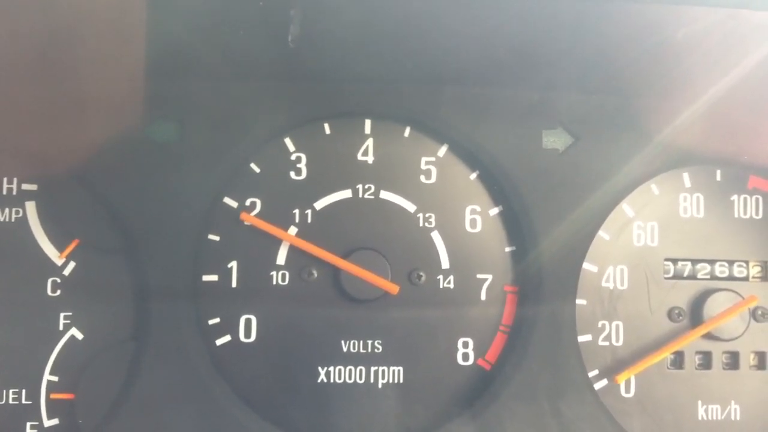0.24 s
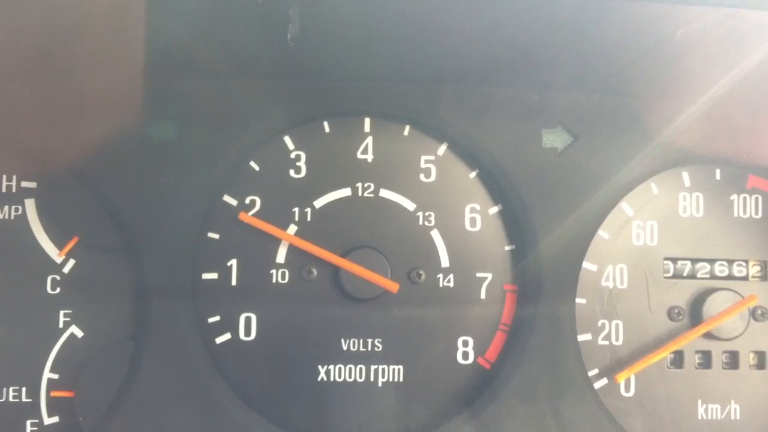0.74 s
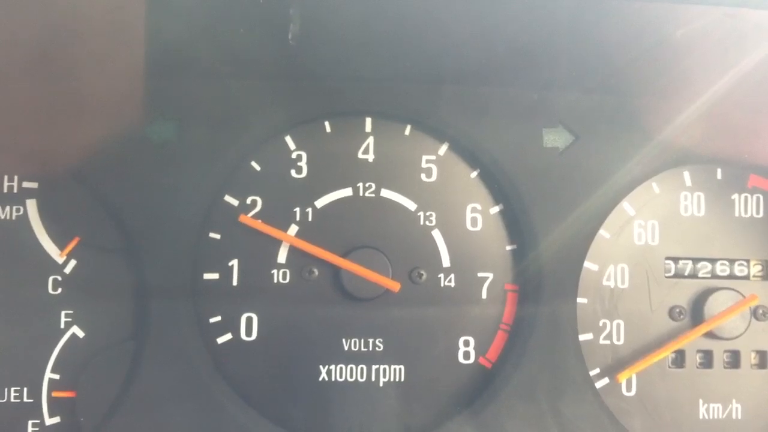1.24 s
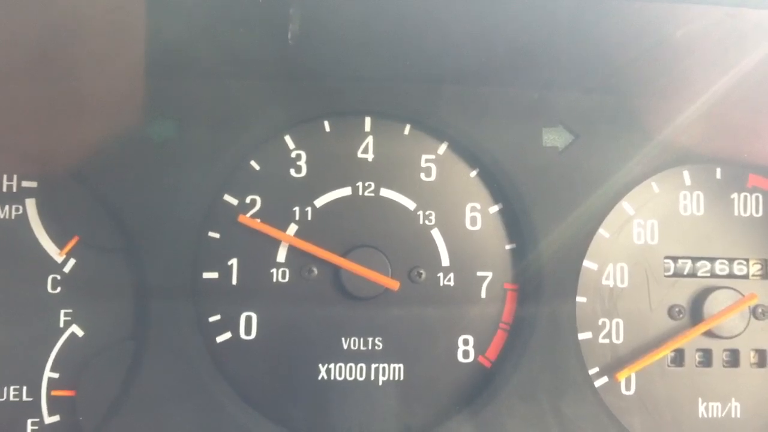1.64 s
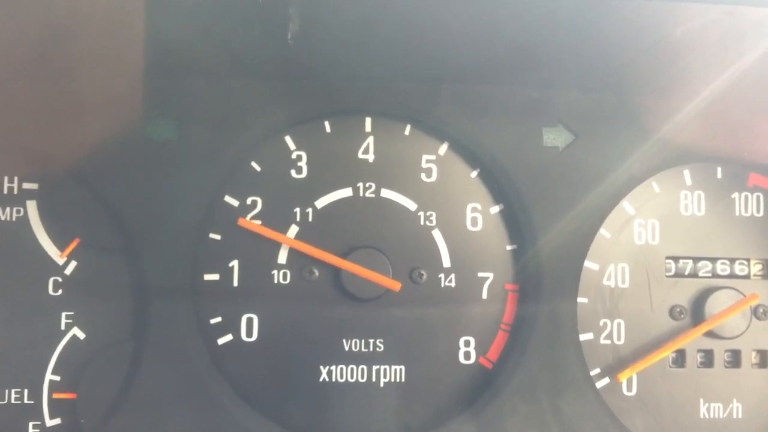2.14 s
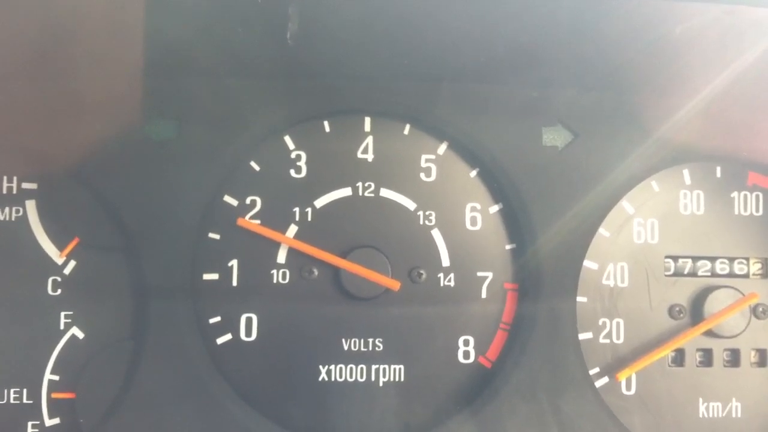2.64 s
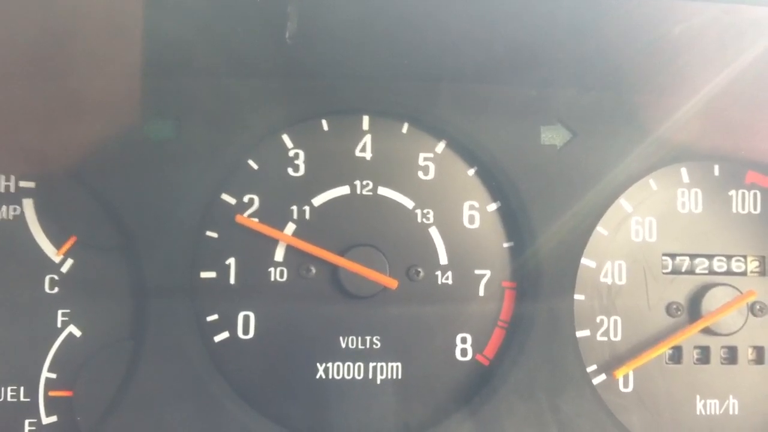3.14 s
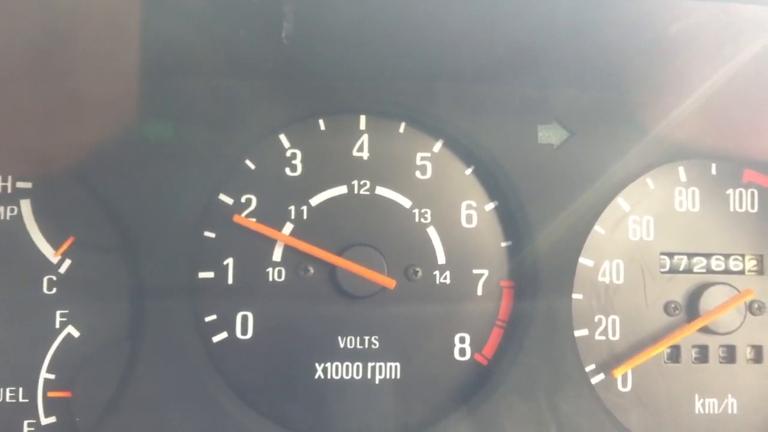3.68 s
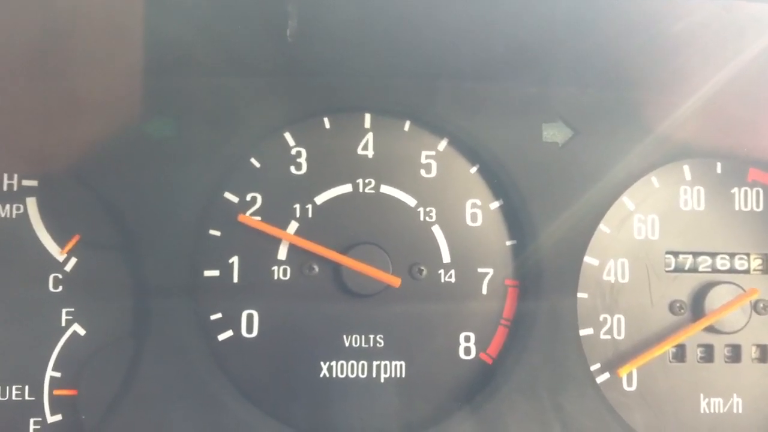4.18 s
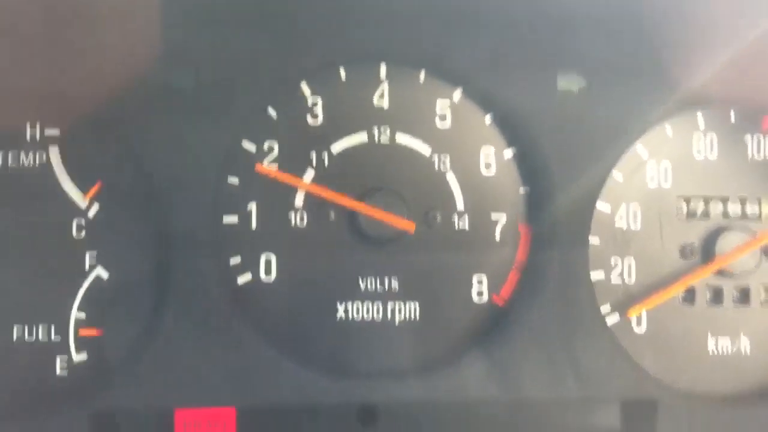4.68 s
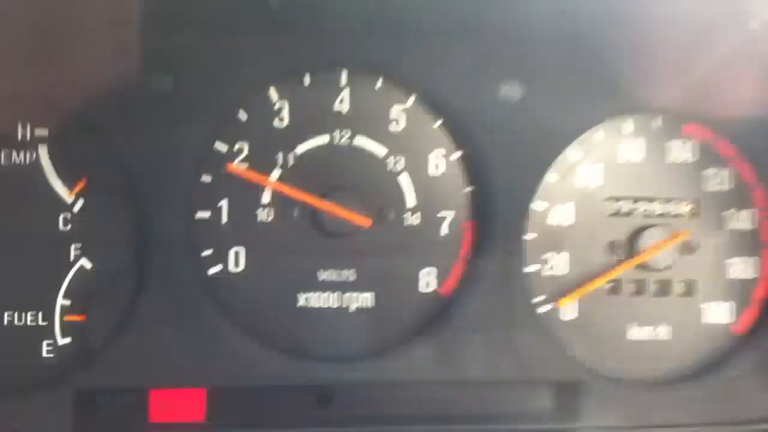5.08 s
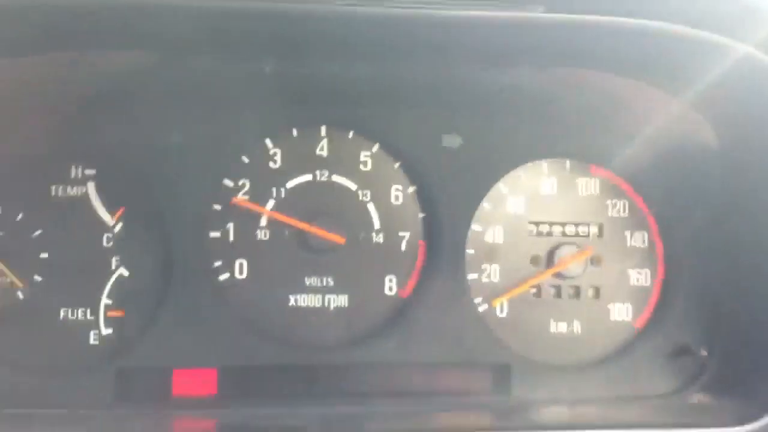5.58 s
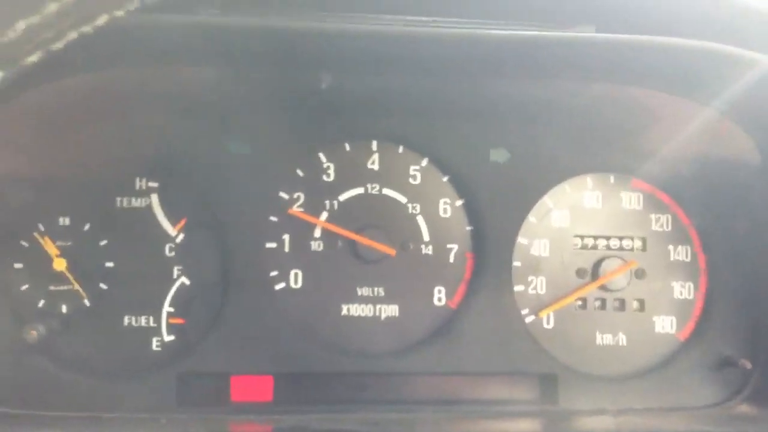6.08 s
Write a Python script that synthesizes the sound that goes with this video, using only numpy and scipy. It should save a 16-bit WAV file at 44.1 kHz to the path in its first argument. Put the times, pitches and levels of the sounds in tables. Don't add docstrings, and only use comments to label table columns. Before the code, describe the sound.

For about 6.3 seconds a rotary engine idles roughly, heard inside a parked car with a small microphone near the dash. From the start, boomy bursts arrive roughly four and a half times a second. Each is a tight cluster of overlapping low thumps with a hollow exhaust ring and rasp, then a short sag filled with weak, uneven puffs. Loose trim gives a dry, hissy rattle with the bursts, notably sharper around 1.1, 1.6, 2.0, 3.2 and 5.1 seconds. A thin alternator whine glides up with every burst and drops back. Steady body drone, fan and intake hiss and floor rumble stay beneath. The rhythm slows very slightly until about 5.5 seconds, then recovers a little. From 4.3 seconds the microphone pulls back, making the tone a bit brighter and the whine clearer. The idle continues to the end without revving or stopping.

```python
import sys
import numpy as np
from scipy import signal
from scipy.fft import rfft, irfft, next_fast_len
from scipy.io import wavfile
from scipy.ndimage import uniform_filter1d, map_coordinates

SR = 44100
rng = np.random.default_rng(int(sys.argv[2]) if len(sys.argv) > 2 else 0)


def convert_level_to_amplitude(level_db):
    exponent = np.asarray(level_db, float) / 20
    return 10 ** exponent


def persist_wave(psi):
    counts = np.round(np.clip(psi, -1, 1) * 32767).astype(np.int16)
    wavfile.write(sys.argv[1], SR, np.atleast_2d(counts).T)


N = 278712

# first blast in seconds, half turns until the other rotor joins, thump in dB,
# rattle of the first blast in dB.
BURSTS = [(0.049, 1, -9, 7), (0.2688, 1, -9, 2), (0.4889, 1, -9, 2), (0.6781, 3, -9.5, 4),
          (0.9007, 3, -9.5, 4), (1.127, 3, -9.5, 10), (1.351, 3, -10.5, 5), (1.5764, 3, -8.5, 10),
          (1.8048, 3, -11.5, 0), (2.0322, 3, -10.5, 10), (2.263, 3, -8.5, 1), (2.4927, 3, -10, 5),
          (2.7558, 1, -8.5, 3), (2.9821, 1, -8.5, 6), (3.2082, 1, -7.5, 17), (3.4376, 1, -9, -9),
          (3.6655, 3, -9.5, 4), (3.893, 3, -11, -9), (4.158, 3, -8.5, -1), (4.3872, 3, -9.5, 5),
          (4.6221, 3, -9.5, 3), (4.8545, 3, -9.5, -4), (5.054, 1, -8.5, 15), (5.239, 1, -9, -23),
          (5.461, 3, -11.5, 4), (5.6836, 1, -10.5, 6), (5.921, 1, -11.5, 2), (6.155, 1, -10, -3)]
ODD_BURSTS = {17: (4, 3), 21: (3, 2), 24: (3, 2)}
# time in seconds, first turn of a burst in ms.
IDLE = [
    (0, 31.7),
    (1, 33.2),
    (3.4, 33.3),
    (4.6, 34.5),
    (5.5, 34.6),
    (6.32, 33.2),
]
# centre in Hz, width in Hz, level in dB, polarity.
PIPE_MODES = [(109.5, 11.5, -16, 1), (130.5, 10.1, -16.5, 1), (185.8, 8.9, -6, 1), (225.2, 41.3, -11, -1),
              (348.2, 21.6, -20.5, 1), (374, 16.4, -27.5, -1), (413, 38.4, -26, 1), (501, 11.6, -26, -1),
              (591, 35, -37, 1), (692, 38, -43, -1)]
# centre in Hz, width in Hz, level in dB, polarity.
BODY_MODES = [(122, 14.2, -15, 1), (202.5, 18.4, -5, -1), (227.6, 46, -13, 1)]
# frequency in Hz, density in dB per Hz.
RASP = [(160, -19.5), (270, -17), (311, -7.5), (435, -13.5), (594, -14.5), (749, -40), (936, -23),
        (1040, -16), (1600, -32.5), (2080, -67), (3520, -120)]
# frequency in Hz, density in dB per Hz.
TRIM_HISS = [(880, 0), (1500, -5), (1620, 0), (2430, 4.5), (2780, 3), (3130, 2), (3770, 0.5), (5160, 3),
             (7560, -1), (8760, -0.5), (10100, -3), (14200, -3.5), (15600, -5)]
# centre in Hz, spread in Hz.
TRIM_PARTS = [(2500, 2700), (5500, 4300), (9000, 4000), (13500, 8500)]
# frequency in Hz, density in dB per Hz.
FASTENER = [(8000, -46), (8650, -4), (8950, 5), (9700, -21)]
# multiple of the whine, level in dB rms.
WHINE_OVERTONES = [(1, -53.5), (2, -65.5), (3, -57), (4, -58), (5, -60), (6, -61), (8, -66)]
# centre in Hz, width in Hz, level in dB, polarity.
CASING_MODES = [(1102, 180, -0.5, 1), (3370, 150, -2, 1)]
# centre in Hz, width in Hz, level in dB, polarity.
DASH_MODES = [(505, 13, 0, 1), (707, 14, 3, 1), (1074, 16.3, 7.5, 1), (3063, 53, -4.5, 1),
              (4300, 68, -7, 1), (5230, 120, -9.5, 1)]
# frequency in Hz, density in dB per Hz.
DRONE = [(150, -33), (250, -7), (301, -11), (347, -15.5), (411, -16.5), (715, -19.5), (781, -24),
         (1060, -21), (1200, -28), (1700, -40), (2210, -50), (3740, -120)]
# frequency in Hz, density in dB per Hz.
RUSH = [(820, 3), (1400, 4.5), (1750, -2), (2870, -3.5), (3140, -4), (3540, -4.5), (5100, -2.5),
        (8020, -10), (9150, -8), (14100, -15.5), (15600, -17.5)]
# frequency in Hz, density in dB per Hz.
RUMBLE = [(41, -42), (70, -75), (107, 23), (129, 46), (156, 18), (216, 13.5), (247, 31), (300, -28),
          (390, -45), (660, -120)]
# time in seconds, share from 0 to 1.
PULL_BACK = [
    (0, 0),
    (4.3, 0),
    (5, 0.4),
    (5.4, 0.7),
    (5.85, 0.76),
    (6.32, 0.92),
]
# frequency in Hz, gain in dB.
BACK_COLOUR = [(60, -3), (110, 2), (200, 2.5), (300, -1), (420, -5.5), (600, -3), (720, 2), (930, 3.5),
               (1080, -6.5), (1500, 1), (2000, 5), (2400, -0.5), (3000, 1), (3600, 0)]
# frequency in Hz, density in dB per Hz.
HANDLING = [(10, -4), (40, -3), (70, -10), (140, -120)]

FACES = 3
GAIN_MS, LAST_GAIN_MS = 0.259, 1.25
LATE_MS = 0.54
JOIN_DB, JOIN_RATTLE_DB, JOIN_SHARE = -10, 1, 0.21
LAST_BLAST_DB = 0.6
RATTLE_DB, RATTLE_SCATTER_DB = -43.5, np.sqrt(2)
GEARING = 33.8
SLOWEST_HZ, SURGE_HZ = -16, 91.7
SURGE_LOSS_HZ = 7
COAST_S = 0.1251
WHINE_BACK_DB = 2.5
DRONE_DB, DRONE_DB_PER_MS = -35.5, -0.2
MIC_TOP_HZ = 15780


def unit(x):
    return x / np.sqrt(np.mean(x ** 2) + 1e-20)


def curves(rows):
    s, *cols = np.transpose(rows)
    return [np.interp(np.arange(N) / SR, s, c) for c in cols]


def wobble(rate_hz):
    return map_coordinates(rng.standard_normal(int(N * rate_hz / SR) + 4), [np.arange(N) * rate_hz / SR])


def along(points, hz):
    f, db = np.transpose(points)
    return convert_level_to_amplitude(np.interp(np.log(hz + 1), np.log(f + 1), db))


def resonances(modes, hz):
    return sum(np.sign(polarity) * convert_level_to_amplitude(db) * 1j * hz * width / (centre * centre - hz * hz + 1j * hz * width)
               for centre, width, db, polarity in modes)


def filtered(x, response):
    m = next_fast_len(N + SR // 2)
    return irfft(rfft(x, m) * response(np.fft.rfftfreq(m, 1 / SR)), m)[:N]


def noise(spectrum):
    return unit(filtered(rng.standard_normal(N), lambda hz: along(spectrum, hz)))


def impulses(s, size):
    at = np.round(s * SR).astype(int)
    keep = (at >= 0) & (at < N)
    return np.bincount(at[keep], size[keep], N)


def runs():
    rows = []
    for k, (s, halves, thump_db, rattle_db) in enumerate(BURSTS):
        lead, join = ODD_BURSTS.get(k, (FACES, FACES))
        turn_ms = np.interp(s, *np.transpose(IDLE))
        wait_ms = halves * (turn_ms / 2 - GAIN_MS) + LATE_MS
        join_thump_db = JOIN_DB - JOIN_SHARE * (thump_db - JOIN_DB)
        join_rattle_db = JOIN_RATTLE_DB - JOIN_SHARE * rattle_db
        rows.append((s, lead, turn_ms, thump_db, rattle_db))
        rows.append((s + wait_ms / 1000, join, turn_ms - GAIN_MS * halves, join_thump_db, join_rattle_db))
    return rows


def firings():
    rows = []
    for s, count, first_ms, thump_db, rattle_db in runs():
        turns_s = np.linspace(first_ms, first_ms - LAST_GAIN_MS, count - 1) / 1000
        first = np.arange(count) == 0
        last = first[::-1]
        rows += zip(s + np.r_[0, np.cumsum(turns_s)],
                    thump_db + 1.15 * first + LAST_BLAST_DB * last,
                    np.where(first, 0.73 * rattle_db, -1.5))
    return np.transpose(rows)


def swell(at_s, size, rise_s, fall_s):
    t = np.arange(SR // 8) / SR
    return signal.fftconvolve(impulses(at_s, size), np.exp(-t / fall_s) - np.exp(-t / rise_s))[:N]


def blasts():
    s, thump_db, rattle_db = firings()
    scatter = rng.standard_normal((len(s), 2))
    thump = convert_level_to_amplitude(thump_db + 1.0 * scatter[:, 0])
    rattle = convert_level_to_amplitude(rattle_db + RATTLE_SCATTER_DB * scatter[:, 1])
    boom = filtered(impulses(s - 0.0029, thump * convert_level_to_amplitude(55.5)), exhaust)
    rasp = convert_level_to_amplitude(-37) * unit(swell(s - 0.004, thump, rise_s=0.004, fall_s=0.02)) * noise(RASP)
    return boom + rasp + rattling(s, rattle)


def exhaust(hz, echo=0.47, echo_s=0.00824):
    return resonances(PIPE_MODES, hz) * (1 + echo * np.exp(-2j * np.pi * hz * echo_s))


def rattling(s, size):
    drive = uniform_filter1d(swell(s - 0.008, size, rise_s=0.0047, fall_s=0.011), SR // 90)
    shaken = np.abs(drive) ** 0.53
    grainy = convert_level_to_amplitude(0.88 * wobble(40) + 1.0 * wobble(500))
    fastener = convert_level_to_amplitude(-11.0 + 2.3 * wobble(25)) * noise(FASTENER)
    return convert_level_to_amplitude(RATTLE_DB) * unit(shaken * grainy) * (trim() + fastener)


def trim():
    def part(centre, spread):
        return filtered(rng.standard_normal(N),
                        lambda hz: along(TRIM_HISS, hz) * np.exp(-((hz - centre) / spread) ** 2))
    return unit(sum(convert_level_to_amplitude(3.0 * wobble(30)) * part(centre, spread) for centre, spread in TRIM_PARTS))


def pumping(turn):
    s = np.interp(np.arange(-2, 2 * turn[-1]), 2 * turn, np.arange(N) / SR, left=-1)
    draw = rng.standard_normal((len(s), 2))
    uneven_db = 1.8 * draw[:, 0] + 0.8 * (np.arange(len(s)) % 2)
    pulses = impulses(s + 0.0035 + 0.0008 * draw[:, 1], convert_level_to_amplitude(35.0 + uneven_db))
    return filtered(pulses, lambda hz: resonances(BODY_MODES, hz))


def whine_hz():
    start, count, turn_ms = np.transpose(runs())[:3]
    end = (start + (count - 1) * turn_ms / 1000).reshape(-1, 2).max(axis=1)
    slow = GEARING * 1000 / turn_ms[::2] + SLOWEST_HZ
    fast = slow + SURGE_HZ - SURGE_LOSS_HZ * np.transpose(BURSTS)[1]
    s = np.r_[start[0] - COAST_S, np.ravel([start[::2], end], "F"), end[-1] + COAST_S]
    hz = np.r_[fast[0], np.ravel([slow, fast], "F"), slow[-1]]
    return curves(np.c_[s, hz])[0]


def shaft(hz):
    turn = np.cumsum(hz / GEARING) / SR
    starts = np.round(np.transpose(BURSTS)[0] * SR).astype(int)
    slip = np.unwrap(turn[starts] % 0.5, period=0.5)
    return turn - np.interp(np.arange(N), starts, slip)


def alternator(hz, turn):
    flutter = 0.015 * np.sin(4 * np.pi * turn) + 0.025 * wobble(70)
    cycles = np.cumsum(hz) / SR + flutter
    whine = np.zeros(N)
    for multiple, db in WHINE_OVERTONES:
        level = convert_level_to_amplitude(db + 3 + 2.5 * wobble(20) + 3 * wobble(75))
        whine += level * np.sin(2 * np.pi * multiple * cycles)
    return filtered(whine, lambda hz: 1 + resonances(CASING_MODES, hz))


def engine_bay(drone_db):
    drone = convert_level_to_amplitude(drone_db + 0.62 * wobble(14)) * noise(DRONE)
    rush = convert_level_to_amplitude(-41 + 0.51 * wobble(12)) * noise(RUSH)
    rumble = convert_level_to_amplitude(-40 + 1.5 * wobble(8)) * noise(RUMBLE)
    return drone + rush + rumble


def scene():
    hz, idle_ms, back = whine_hz(), curves(IDLE)[0], curves(PULL_BACK)[0]
    turn = shaft(hz)
    whine = convert_level_to_amplitude(WHINE_BACK_DB * back) * alternator(hz, turn)
    drone_db = DRONE_DB + DRONE_DB_PER_MS * (idle_ms - idle_ms.mean())
    bay = filtered(whine + engine_bay(drone_db), lambda hz: 1 + resonances(DASH_MODES, hz))
    near = blasts() + pumping(turn) + bay
    far = filtered(near, lambda hz: along(BACK_COLOUR, hz))
    return ((1 - back) * near + back * far)[None]


def roll_off(x):
    return signal.sosfilt(signal.butter(12, 15770, fs=SR, output="sos"), x)


def record(dry):
    def microphone(hz):
        ratio = hz / 75
        bass_cut = ((1j * ratio) ** 2 / (1 + 0.7j * ratio - ratio ** 2)) ** 2
        return bass_cut * (hz < MIC_TOP_HZ)
    handling = convert_level_to_amplitude(-57.5) * noise(HANDLING)
    return roll_off((filtered(dry[0], microphone) + handling)[None])


dry = scene()
out = record(dry)
persist_wave(out)
```